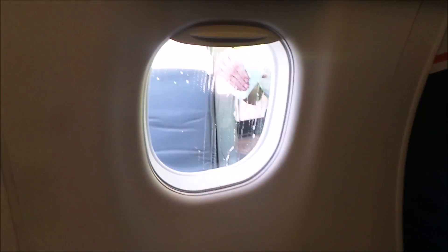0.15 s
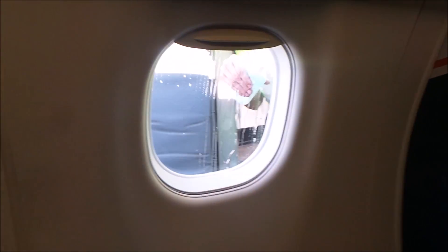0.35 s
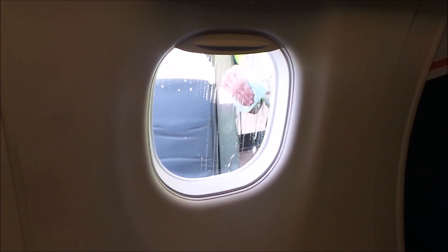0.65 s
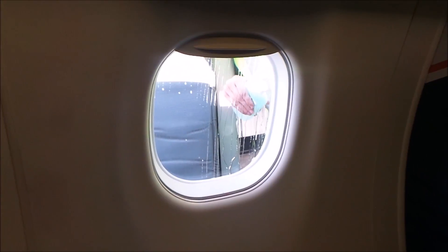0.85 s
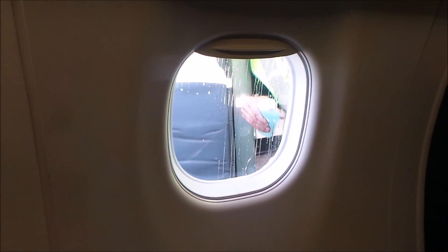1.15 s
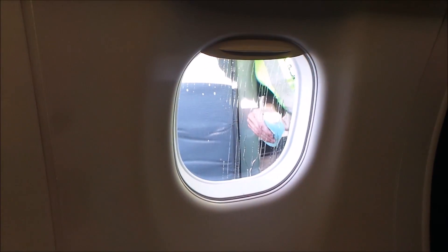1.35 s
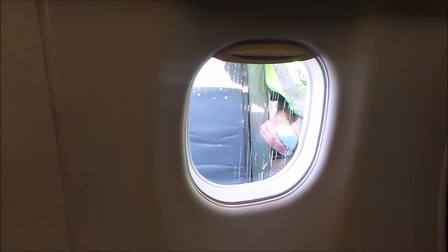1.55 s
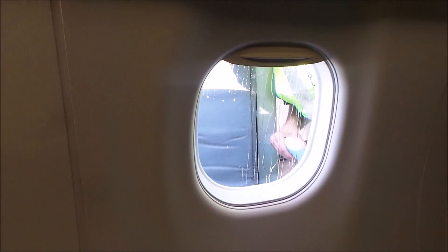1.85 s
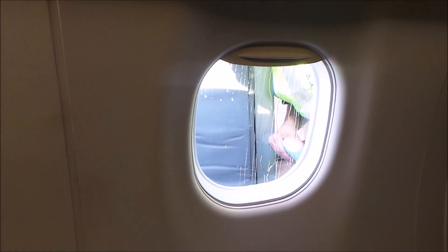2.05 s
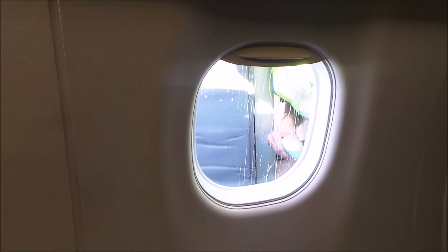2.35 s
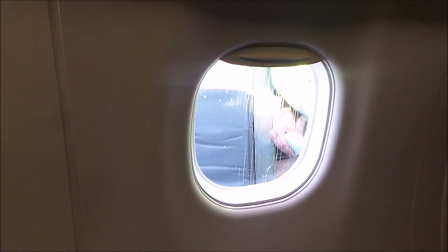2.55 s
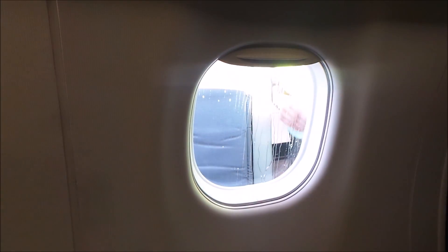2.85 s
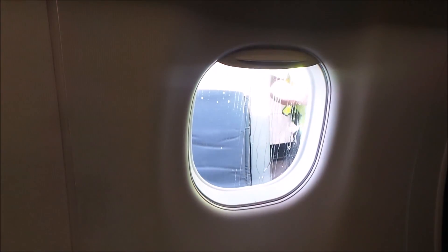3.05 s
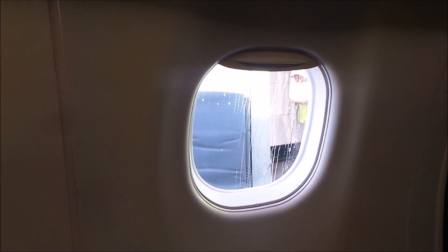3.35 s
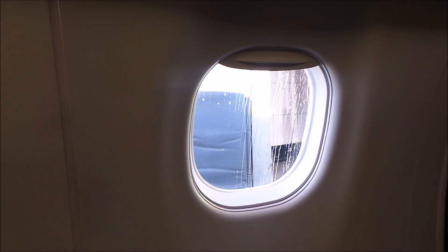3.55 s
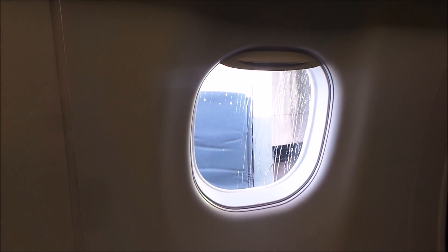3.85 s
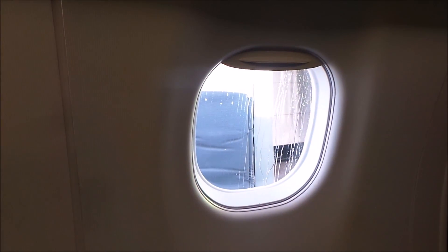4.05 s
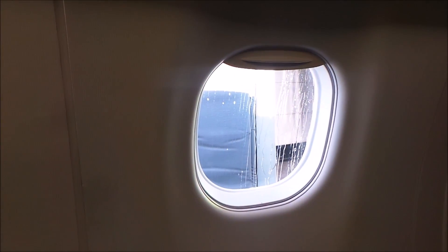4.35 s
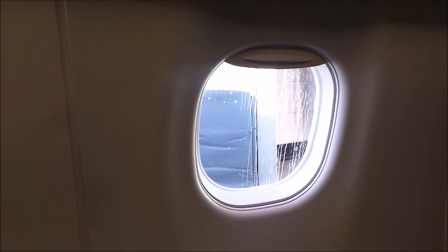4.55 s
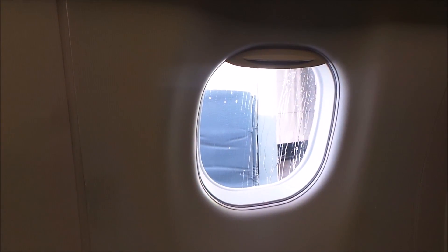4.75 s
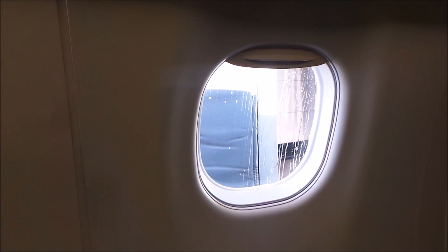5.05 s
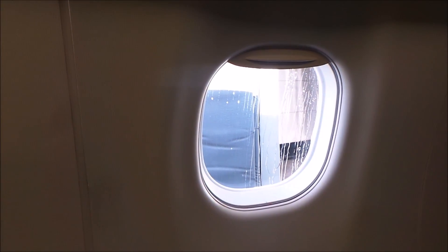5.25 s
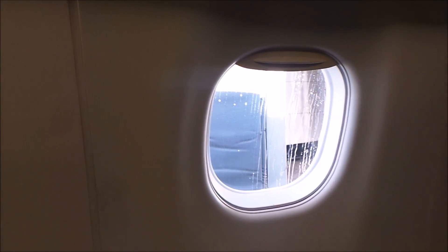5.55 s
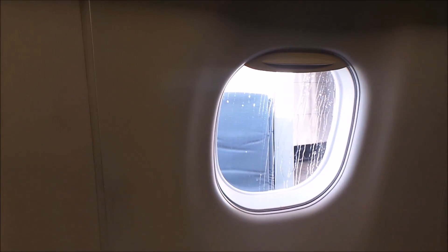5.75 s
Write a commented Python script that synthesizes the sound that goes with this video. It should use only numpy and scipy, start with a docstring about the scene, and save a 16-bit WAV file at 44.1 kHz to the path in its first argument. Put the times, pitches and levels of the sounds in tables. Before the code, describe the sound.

Continuous ducted air noise, bassy and slightly fluttering, lies under a steady low tone that sags very slightly. Barely audible high fan lines sit above it. Cabin panels snap now and then: one woody knock in the first second, a crisp crack later, a faint tick, then a quick run of snaps and a hard knock. Mono, close interior, brief reverberation.

```python
"""The air supply of a parked airliner blows steadily: turbulent noise coloured by ducts and cabin.
With it sound a clean low hum and a faint fan whine, both made of slightly wandering sines.
Now and then trim panels snap and knock somewhere along the cabin: struck modes and a broad crack,
each reaching the one microphone directly and as a short wash of echoes."""
import sys
import numpy as np
from scipy import signal
from scipy.fft import rfft, irfft
from scipy.io import wavfile

SR = 44100
rng = np.random.default_rng(int(sys.argv[2]) if len(sys.argv) > 2 else 0)


def gain_from_db(level_db):
    """Turn a decibel level (scalar or array-like) into a linear amplitude factor."""
    decades = np.asarray(level_db, float) / 20
    return 10 ** decades


def wav_record(signal):
    """Record a signal, one row per channel, as 16-bit PCM in the file named by sys.argv[1]."""
    frames = np.transpose(np.atleast_2d(signal))
    bounded = np.clip(frames, -1, 1)
    # unit amplitude maps onto the largest positive 16-bit level
    quanta = np.round(bounded * 32767).astype(np.int16)
    wavfile.write(sys.argv[1], SR, quanta)


N = 260631  # length [samples]


def rms_one(x):
    """Scale to rms 1."""
    return x / np.sqrt(np.mean(x ** 2) + 1e-20)


def at_hz(points, hz):
    """Read a (frequency [Hz], value) table on a log-frequency axis."""
    table_hz, values = np.array(points).T
    return np.interp(np.log(hz), np.log(table_hz), values)


def drift(corner_hz):
    """Slow chance of spread 1: noise through two equal one-pole low-passes."""
    hop = 40  # samples between drawn points
    pole = np.exp(-2 * np.pi * corner_hz * hop / SR)
    noise = rng.standard_normal(N // hop + 4002)
    slow = signal.lfilter([1], [1, -2 * pole, pole * pole], noise)[4000:]  # settled part
    slow = rms_one(slow - slow.mean())
    return np.interp(np.arange(N) / hop, np.arange(len(slow)), slow)


def band(x, low_hz, high_hz):
    """Butterworth band-pass, its upper edge kept below half the sample rate."""
    edges_hz = [low_hz, min(high_hz, .45 * SR)]
    return signal.sosfilt(signal.butter(2, edges_hz, "band", fs=SR, output="sos"), x)


def airflow(flutter_db):
    """Turbulent noise coloured by the ducts; each octave flutters a little, mostly on its own."""
    # colour of the airflow: (frequency [Hz], relative level per Hz [dB])
    airflow_colour = [(15, -36), (26, -30), (45, -6.5), (69, -5.5), (144, -8.5), (242, -13), (320, -14.5),
                      (721, -21.5), (946, -26), (2820, -35.5), (3230, -36.5), (4200, -37), (5000, -40),
                      (9600, -42), (11500, -46.5), (15500, -59)]
    # duct and cabin resonances: (centre [Hz], width [Hz], lift at the centre [dB])
    duct_resonances = [(72, 13.3, 7), (121.7, 12, 9), (230.5, 54, 5.5), (260, 16.6, 4), (341, 8.7, 6.5),
                       (493, 154, 4), (613, 12, 4), (706, 19, 6), (804, 94, 4), (1270, 59, 2),
                       (1437, 14, 7), (1604, 13, 6.5), (1928, 26, 7), (2122, 29, 7.5), (2445, 250, 5.5),
                       (2680, 250, 1), (3520, 52, 6.5)]
    hz = np.maximum(np.fft.rfftfreq(N, 1 / SR), 5)
    colour_db = at_hz(airflow_colour, hz)
    for centre_hz, width_hz, lift_db in duct_resonances:
        colour_db = colour_db + lift_db / (1 + (2 * (hz - centre_hz) / width_hz) ** 2)
    spectrum = rfft(rng.standard_normal(N)) * gain_from_db(colour_db)
    air = 0
    together = drift(6.6)
    for octave in range(10):
        share = np.clip(1 - np.abs(np.log2(hz / 30) - octave), 0, 1)  # overlapping octaves from 30 Hz
        flutter = gain_from_db(flutter_db * (0.057 * together + drift(22.6)))
        air = air + irfft(spectrum * share, N) * flutter
    return gain_from_db(-30.5) * rms_one(air)


def tone(hz, wander_hz, waver_db):
    """A sine of about rms 1 whose pitch and level wander slightly."""
    turns = np.cumsum(hz + wander_hz * drift(1.44)) / SR
    phase = 2 * np.pi * (turns + rng.random())
    return np.sqrt(2) * np.sin(phase) * gain_from_db(waver_db * drift(12.0))


def hum():
    """The steady low tone of the air supply, sagging a little."""
    start_db, sag_db_per_s = -27.5, 0.24
    level_db = start_db - sag_db_per_s * np.arange(N) / SR
    return gain_from_db(level_db) * tone(194.56, wander_hz=0.41, waver_db=1.22)


def whine():
    """Thin lines from the fan: shaft, blade line split into sidebands by the shaft, and a few more."""
    # other thin lines: (frequency [Hz], rms level [dB])
    thin_lines = [(2870, -63.5), (6474, -68.5), (6623, -73)]
    # place of each sideband: (shaft turns above the blade line)
    sideband_turns = [-1, 1, 2]
    # strength of each sideband at the start: (rms level [dB])
    sideband_levels = [-64, -66, -65.5]
    shaft_hz, blade_hz = 73.2, 2751
    t = np.arange(N) / SR
    blade_db = -58.5 - 0.4 * t ** 2  # fades ever faster
    lines = [(shaft_hz, -41), (blade_hz, blade_db)]
    lines += list(thin_lines)
    for turns, start_db in zip(sideband_turns, sideband_levels):
        rising_db = start_db + 0.1 * t  # sidebands grow as the blade line fades
        lines.append((blade_hz + turns * shaft_hz, rising_db))
    return sum(gain_from_db(db) * tone(hz, wander_hz=hz / 4000, waver_db=1.5) for hz, db in lines)


def struck(modes, weight_db, size):
    """Decaying sines of alternating sign, weighted by weight_db(Hz), each strength varying by blow."""
    t = np.arange(size) / SR
    ring = 0
    for k, (hz, level_db, t60) in enumerate(modes):
        strength_db = level_db + weight_db(hz) + rng.standard_normal()
        ring = ring + gain_from_db(strength_db - 60 * t / t60) * np.sin(2 * np.pi * hz * t) * (-1) ** k
    return ring


def cabin_echoes(size):
    """Dense echoes of one impulse: they build up over a few ms, then each band dies at its own rate."""
    # how long the cabin rings: (frequency [Hz], t60 [s])
    cabin_decay = [(300, 0.11), (700, 0.14), (1500, 0.21), (3000, 0.19), (6000, 0.21), (12000, 0.18)]
    t = np.arange(size) / SR
    build_up = 1 - np.exp(-t / 0.00072)  # time constant in s
    white = rng.standard_normal((2, size))  # neighbouring bands take different noise
    out = 0
    for k, low_hz in enumerate(200 * 2 ** np.arange(0, 6.5, 1 / 3)):  # third octaves
        fade = gain_from_db(-60 * t / at_hz(cabin_decay, low_hz)) * build_up
        echoes = band(white[k % 2], low_hz, low_hz * 2 ** (1 / 3)) * fade
        out = out + echoes * np.sqrt(low_hz / np.sum(echoes ** 2))  # the same energy per Hz in every band
    return out / np.sqrt(np.sum(out ** 2))


def panels():
    """Each event knocks the panel, clicks its fasteners and cracks broadly, heard through the cabin."""
    # panel events, levels ahead of the cabin: (time [s], knock level [dB], knock pitch [Hz],
    # click level [dB], click pitch [Hz], crack level [dB], ring against the rest of the crack [dB])
    panel_events = [(.683, -18, 920, -29.5, 2160, -46.5, -32.5), (3.4, -33.5, 950, -28.5, 1860, -30, -12),
                    (4.806, -57, 900, -44, 1900, -37.5, -30), (5.571, -35, 950, -37, 1330, -30.5, -4),
                    (5.576, -52, 900, -37, 2750, -46, -13), (5.666, -12.5, 630, -24.5, 1780, -29, -13),
                    (5.818, -58, 900, -61, 2520, -48.5, -30)]
    # what a knocked panel rings with: (frequency [Hz], relative level [dB], t60 [s])
    panel_modes = [(292.7, -6.5, 0.13), (343, -5.5, 0.092), (412, -7, 0.061), (473, 0.5, 0.044),
                   (565, -1.5, 0.056), (610, -4.5, 0.054), (664, -4.5, 0.051), (812, -8.5, 0.068),
                   (920, -2, 0.032), (996, 2, 0.035), (1147, -4.5, 0.034), (1237, -5, 0.038)]
    # small hard parts that ring in a click: (frequency [Hz], relative level [dB], t60 [s])
    clip_modes = [(1300, 0.5, 0.013), (1433, -1, 0.025), (1488, -0.5, 0.02), (1800, -4.5, 0.022),
                  (2000, -6, 0.017), (2400, -5, 0.015), (2514, -9, 0.017), (2700, -7.5, 0.013),
                  (2887, -11.5, 0.034), (3000, -15.5, 0.011)]
    # faint high ring in a crack: (frequency [Hz], relative level [dB], t60 [s])
    crack_modes = [(3880, 4.5, 0.042), (4270, 4, 0.037), (5140, 0, 0.025), (5700, 1, 0.06), (6400, 2, 0.02),
                   (7400, -5, 0.015)]
    loud_s = .03  # event levels are energy spread over this time
    out, size = np.zeros(N), SR // 2
    impulse = np.eye(1, size)[0] + 1e-18

    def at_level(part, db):
        return gain_from_db(db) * part * np.sqrt(loud_s * SR / np.sum(part ** 2))

    for s, knock_db, knock_hz, click_db, click_hz, crack_db, ring_db in panel_events:
        # modes near the pitch ring most: the weight falls in dB per octave
        knock = struck(panel_modes, lambda hz: -5.0 * np.abs(np.log2(hz / knock_hz)), size)
        click = struck(clip_modes, lambda hz: -7.0 * np.abs(np.log2(hz / click_hz)), size)
        snap = rms_one(band(impulse, 2250, 10000))
        crack = snap + gain_from_db(ring_db) * rms_one(struck(crack_modes, np.zeros_like, size))
        knock = at_level(knock, knock_db)
        click = at_level(click, click_db)
        crack = at_level(crack, crack_db)
        heard = signal.fftconvolve(knock + click + crack, cabin_echoes(size))[:size]
        # direct path: the lows bend round the seats
        heard += gain_from_db(-5.0) * knock + gain_from_db(-6.5) * click + gain_from_db(-19.5) * crack
        at = round(s * SR)
        out[at:at + size] += heard[:N - at]
    return out


def scene():
    """Air, hum, whine and panels at one microphone."""
    return (airflow(flutter_db=1.15) + hum() + whine() + panels())[None]


def band_limit(x):
    """A steep low-pass at the top of the band."""
    return signal.sosfilt(signal.butter(12, 15000, fs=SR, output="sos"), x)


def record(dry):
    """The top is cut steeply above 14.6 kHz by an elliptic low-pass."""
    low_pass = signal.ellip(10, .5, 60, 14600, fs=SR, output="sos")
    cut = signal.sosfilt(low_pass, dry)
    return band_limit(cut)


dry = scene()
out = record(dry)
wav_record(out)
```